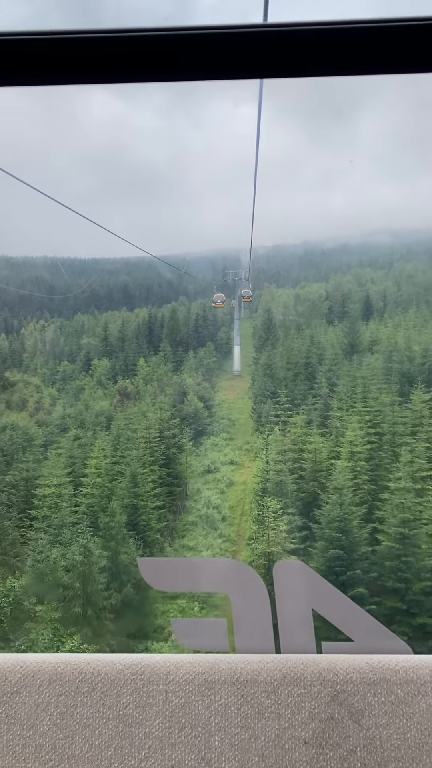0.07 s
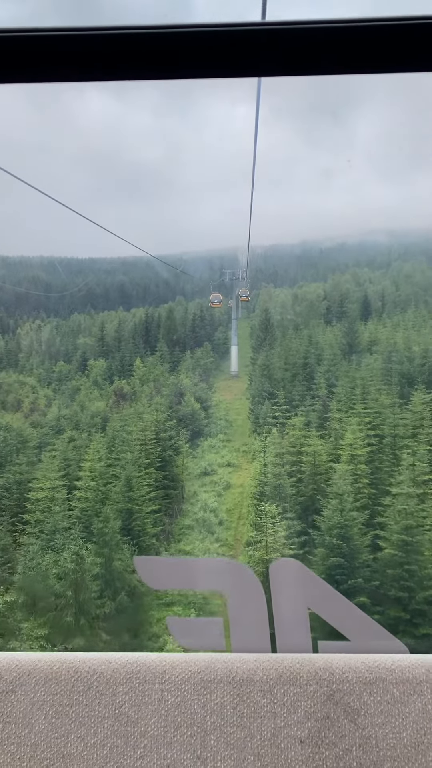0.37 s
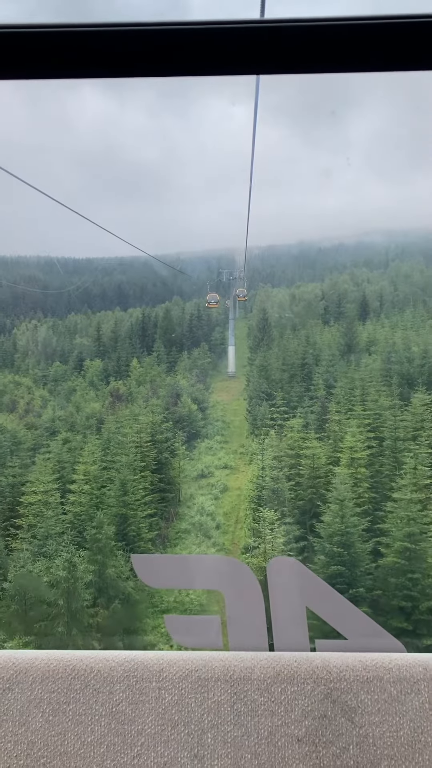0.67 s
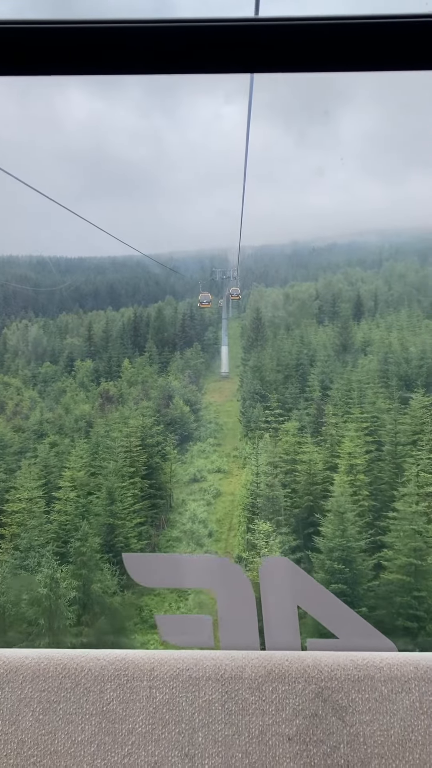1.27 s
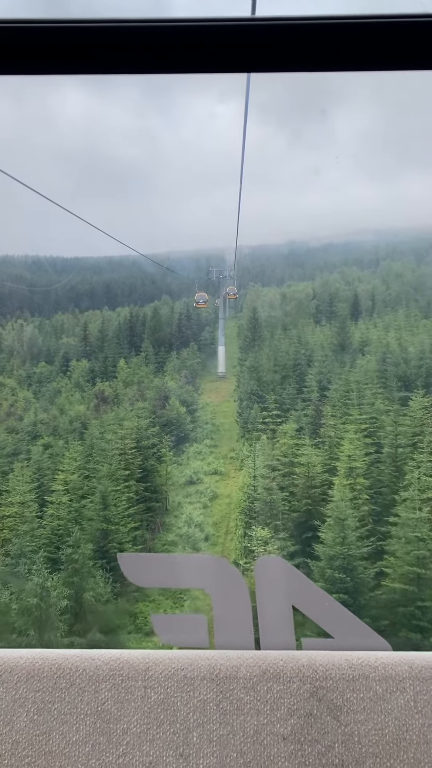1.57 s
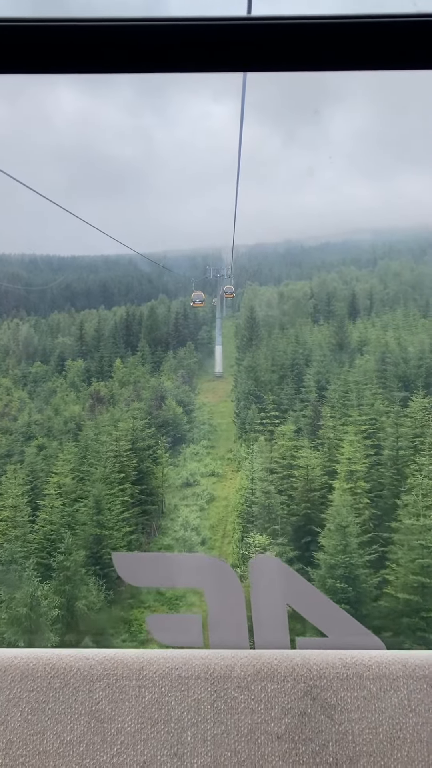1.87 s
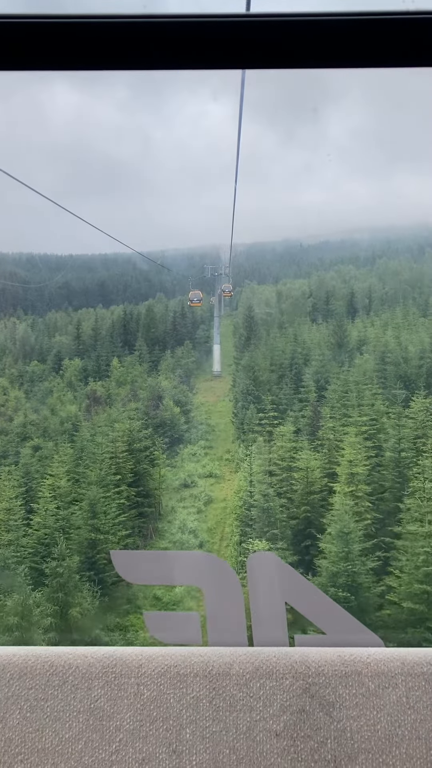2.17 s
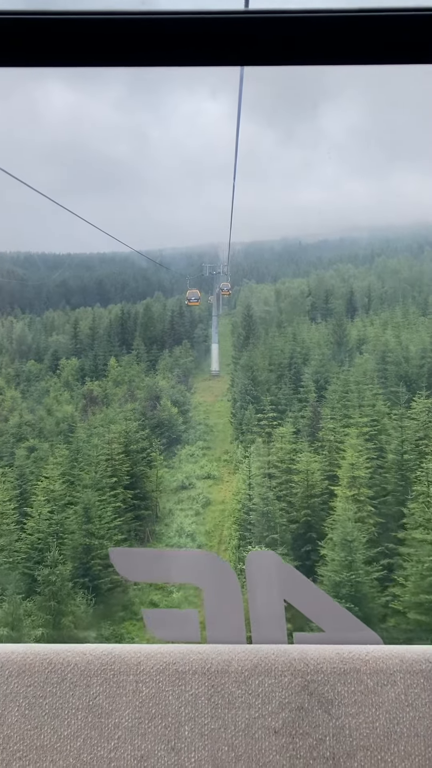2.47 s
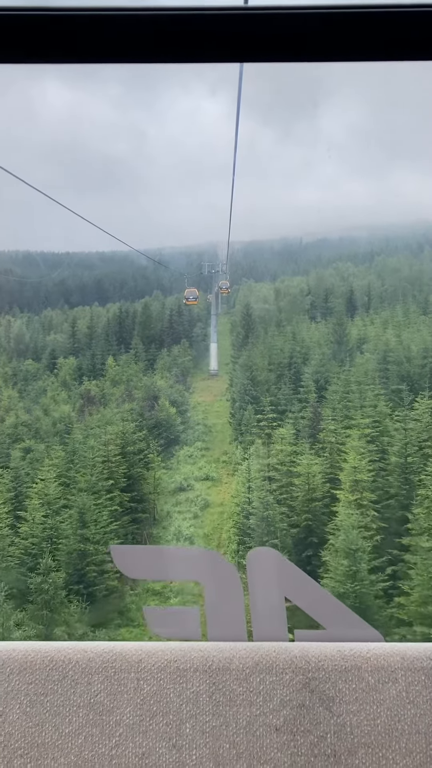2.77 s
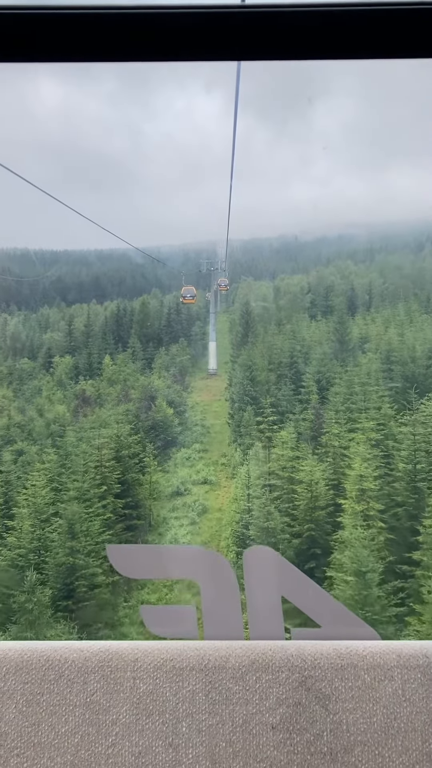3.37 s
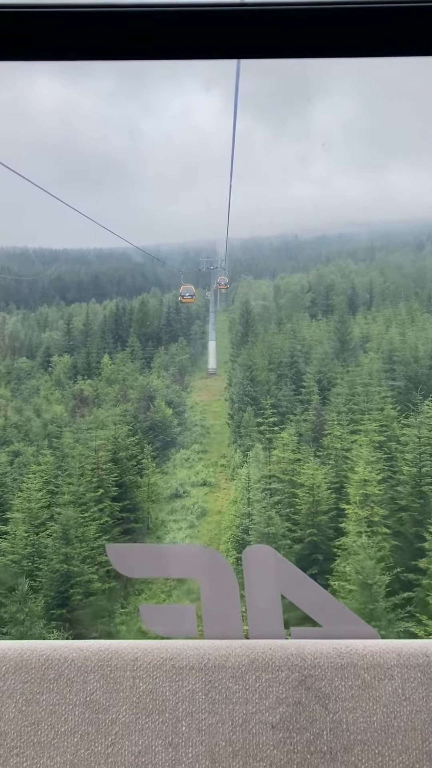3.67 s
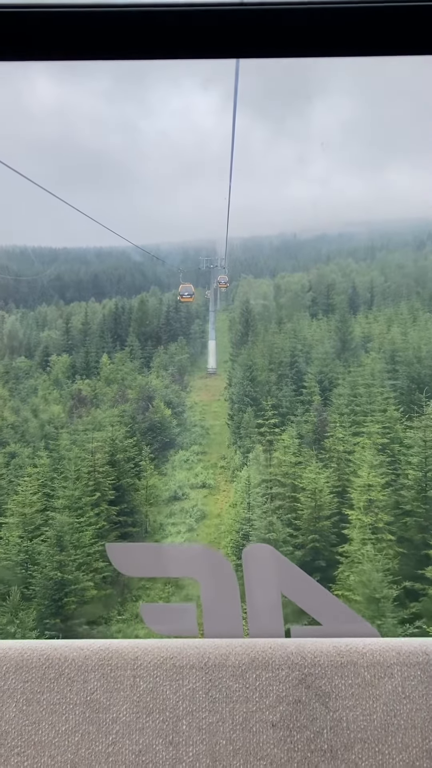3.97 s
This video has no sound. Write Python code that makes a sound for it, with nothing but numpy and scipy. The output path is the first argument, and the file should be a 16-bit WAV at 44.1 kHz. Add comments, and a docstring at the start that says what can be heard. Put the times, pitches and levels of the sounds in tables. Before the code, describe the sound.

Inside a cable car riding over a forest, a low drone and gentle air rush run throughout. The shell rattles faintly and bumps once near the end, while a bird chips regularly and another adds slurred whistles later.

```python
"""Cable car cabin over a forest.

The running rope forces the cabin to drone and keeps its resonances ringing. Air rushes softly past
the shell, which knocks, scrapes and rattles a little and takes one heavier bump.
Outside, a near bird repeats short falling chips, a farther one joins with slurred notes, and a third
gives one thin whistle. The trees scatter these calls, along with a faint distant twitter."""
import sys
import numpy as np
from scipy import signal
from scipy.io import wavfile

SR = 44100
rng = np.random.default_rng(int(sys.argv[2]) if len(sys.argv) > 2 else 0)


def wrap_up_sound(samples):
    """Save the sound to the file named by the first command line argument, as 16-bit audio."""
    columns = np.atleast_2d(samples).T
    # keep every value between -1 and 1, then stretch to whole-number steps
    tamed = np.clip(columns, -1, 1)
    steps = np.round(tamed * 32767).astype(np.int16)
    wavfile.write(sys.argv[1], SR, steps)


N = 176400
TIME = np.arange(N) / SR
WARBLE_PER_S = 220  # pace of the pitch jitter in every bird's voice


def from_db(db):
    """Amplitude ratio of a level in decibels."""
    return 10 ** (np.asarray(db) / 20)


def rms_one(x):
    """Normalisation to unit root-mean-square amplitude."""
    return x / np.sqrt(np.mean(x ** 2) + 1e-30)


def at_hz(points, hz):
    """Interpolation of a spectrum along a logarithmic frequency axis."""
    frequencies, db = np.transpose(points)
    return np.interp(np.log(hz), np.log(frequencies), db)


def stereo(mid, side):
    """Sum and difference of mid and side give left and right."""
    return np.array([mid + side, mid - side])


def drift(rate):
    """Low-passed noise gives a smooth random motion of unit rms, quicker at a higher rate."""
    step, settle = 40, 2000
    pole = np.exp(-2 * np.pi * rate * step / SR)
    slow = signal.lfilter([1], [1, -2 * pole, pole ** 2], rng.standard_normal(N // step + settle + 2))
    slow = rms_one(slow[settle:])
    return np.interp(np.arange(N) / step, np.arange(len(slow)), slow)


def resonate(force, hz, radius):
    """Response of two equal damped resonators in series; a pole radius nearer 1 rings longer."""
    section = [1 - radius, 0, radius - 1, 1, -2 * radius * np.cos(2 * np.pi * hz / SR), radius ** 2]
    return signal.sosfilt([section, section], force)


def resonant_noise(hz, width_hz):
    """Steady-state response of a resonance to a random force, at unit rms."""
    radius = np.exp(-np.pi * width_hz / SR)
    return rms_one(resonate(rng.standard_normal(N + SR), hz, radius)[SR:])


def ringing_modes(modes, side_db):
    """Superposition of randomly driven modes, each differing a little between the ears."""
    return sum(from_db(db) * stereo(resonant_noise(hz, width),
                                    from_db(side_db) * resonant_noise(hz, width))
               for hz, width, db in modes)


def tone(hz):
    """A sine of unit rms whose phase is the integral of its frequency."""
    return np.sqrt(2) * np.sin(2 * np.pi * np.cumsum(hz) / SR)


def note_envelope(t, length, attack_s, release_s):
    """Amplitude envelope with a rounded attack, a hold and a rounded release."""
    rise = np.sin(np.pi / 2 * np.clip(t / attack_s, 0, 1))
    fall = np.sin(np.pi / 2 * np.clip((length - t) / release_s, 0, 1)) ** 2
    return rise * fall


def add(out, start, sound):
    """Superposition of a sound on a channel from its start time."""
    i = max(int(start * SR), 0)
    out[i:i + len(sound)] += sound[:max(N - i, 0)]


def drone():
    """Forced vibration: the rope drives the cabin at one low pitch that swells and sinks."""
    # swell of the drone: (time [s], relative level [dB])
    swell = [(0.0, -44), (0.29, -29), (0.48, -37.5), (0.68, -27.5), (0.77, -39.5), (0.96, -31), (1.26, -47),
             (1.3, -34.5), (1.87, -34.5), (1.92, -56.5), (2.05, -33.5), (2.25, -34), (2.32, -47),
             (2.37, -29), (2.63, -34.5), (2.68, -62), (2.74, -34.5), (4.0, -34.5)]
    level_db = np.interp(TIME, *np.transpose(swell))
    pitch_hz = 67.9 + .4 * drift(2.3)
    ear_db = [[-.1], [-.9]]
    return from_db(level_db) * tone(pitch_hz) * from_db(ear_db)


def cabin():
    """Resonance: random shaking by the rope keeps the cabin's modes ringing."""
    # booms either side of the drone, beating against it: (frequency [Hz], bandwidth [Hz], level [dB])
    booms = [(64.5, 4, -47), (74.5, 4, -46)]
    # modes of the cabin: (frequency [Hz], bandwidth [Hz], level [dB])
    modes = [(33.6, 8.4, -50.5), (50.8, 21, -43.5), (89.2, 21, -54.5), (114.9, 15, -57.5),
             (134.85, 1.3, -57), (164.9, 10, -61), (171.54, 8, -54), (194.34, 11, -52), (204.66, 3.7, -58),
             (216.73, 8, -53.5), (262.9, 10, -55.5), (279.1, 8, -56.5), (327.5, 7.5, -68.5),
             (359.5, 19, -65.5), (441.7, 10, -75.5), (482.5, 47, -73.5), (662.6, 71, -75.5),
             (825, 26, -84.5), (1054, 47, -88.5), (1347, 13, -93), (1547, 36, -101.5)]
    # strength of the shaking: (time [s], relative level [dB])
    shake_level = [(0, 0.5), (.7, -1.3), (.85, -3.5), (1.1, -1), (1.3, 0), (2.05, 0), (2.4, -1), (3.2, 1),
                   (3.45, -2), (3.9, 0)]
    shaking = from_db(np.interp(TIME, *np.transpose(shake_level)))
    return shaking * ringing_modes(booms + modes, side_db=-19)


def soft_rush():
    """Amplitude modulation: narrow noise bands flicker separately in level, patchiest around 1-2 kHz."""
    # spectrum common to both ears: (frequency [Hz], spectral density [dB re 1/Hz])
    mid_spectrum = [(15, -94.5), (30, -72.5), (80, -70.5), (150, -81), (240, -80.5), (300, -83),
                    (450, -86.5), (680, -99), (800, -100.7), (1000, -101.5), (1400, -113), (2000, -129),
                    (2600, -128), (4200, -127), (5800, -137), (8500, -124), (12000, -135), (14500, -131.5)]
    # spectrum differing between the ears: (frequency [Hz], spectral density [dB re 1/Hz])
    side_spectrum = [(15, -97), (50, -69.5), (130, -88), (300, -92.5), (480, -90), (900, -96), (1300, -104),
                     (2000, -120), (4200, -121), (5800, -128), (8500, -139), (11000, -125), (14000, -138)]
    # flicker of each band's level: (frequency [Hz], rms depth [dB])
    flicker_depth = [(300, 1.4), (600, 2.6), (1700, 3.6), (2500, 2)]
    # swell shared by the flickering bands: (time [s], relative level [dB])
    swell = [(0, 0), (.3, -3), (.45, -2.8), (.55, -1), (.8, -1.3), (1.0, -2.8), (1.2, -.5), (1.6, 0),
             (1.8, .3), (1.97, -2), (2.1, -1), (2.22, 1.8), (2.7, .2), (2.9, .8), (3.25, .7), (3.6, .7),
             (3.9, 1.8)]
    edges_hz = np.r_[16 * 2 ** (np.arange(15) / 3), 512 * 2 ** (np.arange(16) / 8),
                     2048 * 2 ** (np.arange(10) / 3)]
    white = rng.standard_normal((2, 2, N)) * np.sqrt(SR / 2)  # unit power per hertz
    swell_db = np.interp(TIME, *np.transpose(swell)) + .4 * drift(12)
    out = np.zeros((2, N))
    for k, (low, high) in enumerate(zip(edges_hz, edges_hz[1:])):
        band = signal.butter(2, [low, high], "band", fs=SR, output="sos")
        mid, side = signal.sosfilt(band, white[k % 2])  # adjacent bands are uncorrelated
        hz = np.sqrt(low * high)
        flicker_db = at_hz(flicker_depth, hz) * drift(10)
        gain = from_db(swell_db + flicker_db) if hz < 3000 else 1  # the top hiss is steady
        out += gain * stereo(from_db(at_hz(mid_spectrum, hz)) * mid,
                             from_db(at_hz(side_spectrum, hz)) * side)
    return out


def bump():
    """Impact excitation: one padded blow rings the shell's low modes, and damping stills them."""
    # modes of the shell: (frequency [Hz], bandwidth [Hz], level [dB])
    modes = [(194, 18, -44), (354, 50, -54), (386, 50, -56), (484, 70, -55), (630, 90, -57),
             (850, 200, -67)]
    start_s, attack_s, t60_s = 2.987, .02, .25
    t = np.maximum(TIME - start_s, 0)
    envelope = np.minimum(t / attack_s, 1) * from_db(-60 * np.maximum(t - attack_s, 0) / t60_s)
    return envelope * ringing_modes(modes, side_db=-5)


def knocks():
    """Heavy damping: each knock on the shell is a dull, brief shudder in one broad resonance."""
    # soft knocks: (time [s], level [dB], centre frequency [Hz])
    blows = [(.35, -72, 1400), (.838, -68, 1000), (1.19, -66, 900), (1.595, -63, 800), (2.25, -56, 480),
             (2.455, -64, 950), (2.8, -66, 950)]
    attack_s, decay_s = .012, .03
    out = np.zeros((2, N))
    for start, db, hz in blows:
        t = np.maximum(TIME - start, 0)
        envelope = np.minimum(t / attack_s, 1) * np.exp(-t / decay_s)
        shudder = np.array([resonant_noise(hz, width_hz=.55 * hz) for ear in range(2)])
        out += from_db(db) * envelope * shudder
    return out


def rattle():
    """Impulse response: tiny random taps ring loose panels briefly, the higher ones more faintly."""
    low_hz, high_hz, taps_per_s, t60_s = 480, 1500, 6, .075
    lowest_panel_db, db_per_octave = -71, -9.5
    radius = from_db(-60 / (t60_s * SR))
    out = np.zeros((2, N))
    for hz in np.geomspace(low_hz, high_hz, 12):
        taps = (rng.random((2, N)) < taps_per_s / SR) * rng.standard_normal((2, N))
        taps += 1e-18 * rng.standard_normal(N)  # keeps the decays from underflowing
        ring = rms_one(resonate(taps, hz, radius))
        out += from_db(lowest_panel_db + db_per_octave * np.log2(hz / low_hz)) * ring
    return out


def scrapes():
    """Friction: soft, uneven rubs swell in the upper panel resonances and stop quickly."""
    # rubs on the shell: (time [s], duration [s], level [dB])
    rubs = [(.68, .2, -74), (1.06, .05, -76), (1.12, .18, -77.5), (1.34, .29, -78), (2.39, .13, -75.5),
            (2.8, .13, -79)]
    # panel resonances: (frequency [Hz], bandwidth [Hz], relative level [dB])
    modes = [(1200, 70, -3), (1330, 110, 1), (1580, 70, -2), (1680, 70, -3.5), (1820, 80, -8)]
    pressure = sum(from_db(db) * note_envelope(TIME - start, length, attack_s=.7 * length, release_s=.03)
                   for start, length, db in rubs)
    ring = sum(from_db(db) * np.array([resonant_noise(hz, width) for ear in range(2)])
               for hz, width, db in modes)
    roughness_db = 2.5 * drift(40)
    return pressure * from_db(roughness_db) * rms_one(ring)


def near_bird():
    """Frequency modulation: each chip dives onto a sagging pitch, and most drop again as they fade."""
    # chips: (time [s], duration [s], held pitch [Hz], final drop [Hz], delay of the drop [s],
    # level [dB], left minus right [dB])
    chips = [(.001, .068, 4920, 1200, .027, -75, 0), (.402, .074, 3940, 130, .046, -75, -1.5),
             (.787, .066, 4490, 20, .056, -76.5, -4.5), (1.197, .068, 4560, 290, .04, -68, -7),
             (1.587, .07, 5020, 1450, .034, -73.5, -5.5), (1.976, .068, 5040, 1450, .027, -77, -1),
             (2.364, .084, 3920, 110, .056, -74.5, -3), (2.672, .05, 4540, 30, .05, -85, -2),
             (2.757, .115, 4600, 0, .04, -73.5, -4.5), (3.097, .042, 3760, 60, .035, -78, 0)]
    top_hz, dive_s, dive_loss_db = 5800, .017, 15
    drop_s, drop_loss_db = .024, 7.5
    sag_hz_per_s, warble_hz = 2400, 35
    right_ear_lag_s, echo_db = .00007, -5.3
    direct = np.zeros((2, N))
    for start, length, hz, drop_hz, drop_after, db, pan_db in chips:
        t = TIME[:int(length * SR)]
        dive = np.clip(1 - t / dive_s, 0, 1) ** 1.7
        dropped = np.sin(np.pi / 2 * np.clip((t - drop_after) / drop_s, 0, 1))
        pitch = hz + (top_hz - hz) * dive - sag_hz_per_s * t - drop_hz * dropped
        pitch += warble_hz * drift(WARBLE_PER_S)[:len(t)]
        amplitude = from_db(db - dive_loss_db * dive - drop_loss_db * dropped)
        chip = amplitude * note_envelope(t, length, attack_s=.005, release_s=.018) * tone(pitch)
        add(direct[0], start, chip * from_db(pan_db / 2))
        add(direct[1], start + right_ear_lag_s, chip * from_db(-pan_db / 2))
    reflected = np.array([echoes(direct[ear], scatter_db=-12)[ear] for ear in range(2)])
    return direct + from_db(echo_db) * reflected


def glides(notes, warble_hz):
    """Linear frequency sweeps with a random warble make a bird's whistled notes."""
    out = np.zeros(N)
    for start, length, from_hz, to_hz, db in notes:
        t = TIME[:int(length * SR)]
        pitch = from_hz + (to_hz - from_hz) * t / length + warble_hz * drift(WARBLE_PER_S)[:len(t)]
        envelope = note_envelope(t, length, attack_s=.012, release_s=.025)
        add(out, start, from_db(db) * envelope * tone(pitch))
    return out


def far_birds():
    """Direct-to-reverberant ratio: a far slurred song is mostly echo, a thin whistle mostly direct."""
    # slurred notes: (time [s], duration [s], start pitch [Hz], end pitch [Hz], level [dB])
    slurs = [(.001, 0.026, 2546, 2850, -76.5), (2.62, .12, 3900, 3270, -85),
             (2.77, 0.086, 3900, 3100, -78.5), (2.91, .07, 4450, 4300, -80), (2.95, .13, 3800, 3200, -78.5),
             (3.16, .065, 4550, 3750, -73), (3.205, 0.1, 3450, 2550, -74.8), (3.36, .06, 4450, 3600, -76.5),
             (3.415, .07, 3450, 2650, -74.5), (3.52, 0.1, 4700, 3700, -78), (3.625, .1, 3400, 2300, -74.8),
             (3.785, 0.065, 4850, 3500, -78.5), (3.85, 0.11, 3300, 2150, -74.3)]
    # the whistle and its faint tail, in the same columns
    whistle_parts = [(2.905, .165, 8600, 7970, -83.5), (3.07, 0.13, 8000, 7670, -98)]
    song = glides(slurs, warble_hz=270)
    whistle = glides(whistle_parts, warble_hz=90)
    return (from_db(-13) * song + from_db(-4) * echoes(song, scatter_db=5)
            + whistle + from_db(-6) * echoes(whistle, scatter_db=-12))


def twitter():
    """Diffuse sound: many faint notes from deep in the forest arrive only as echo."""
    count, length_s, low_hz, high_hz = 60, .04, 2500, 4700
    loudest_db, spread_db = -91, 7.5
    notes = []
    for when, height, distance in rng.random((count, 3)):
        hz = low_hz + height * (high_hz - low_hz)
        notes.append((when * N / SR, length_s, hz, .95 * hz, loudest_db - spread_db * distance))
    return echoes(glides(notes, warble_hz=90), scatter_db=-12)


def echoes(call, scatter_db):
    """Reverberation: quick cabin reflections and, at scatter_db relative to them, scatter from trees."""
    cabin_t60_s, forest_t60_s, side_db = .15, .85, 3
    t = TIME[:SR]
    cabin_decay = rms_one(from_db(-60 * t / cabin_t60_s))
    forest_decay = rms_one(from_db(-60 * t / forest_t60_s))
    decay = rms_one(cabin_decay + from_db(scatter_db) * forest_decay)
    response = rng.standard_normal((2, SR)) * decay / np.sqrt(SR)
    mid, side = signal.fftconvolve(np.atleast_2d(call), response, axes=1)[:, :N]
    return stereo(mid, from_db(side_db) * side)


def scene():
    """Superposition: the pressures from cabin, air and birds add at each ear."""
    return (drone() + cabin() + soft_rush() + knocks() + bump() + scrapes()
            + near_bird() + far_birds() + twitter() + rattle())


def record(dry):
    """Low-pass filtering cuts the highest treble steeply."""
    stop_hz, stop_db = 15400, 60
    return signal.sosfilt(signal.cheby2(14, stop_db, stop_hz, fs=SR, output="sos"), dry)


dry = scene()
out = record(dry)
wrap_up_sound(out)
```